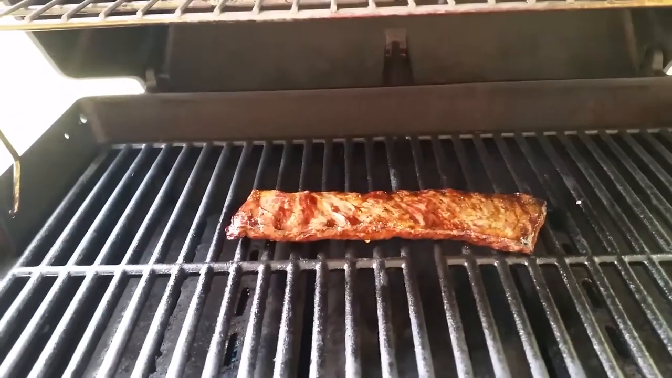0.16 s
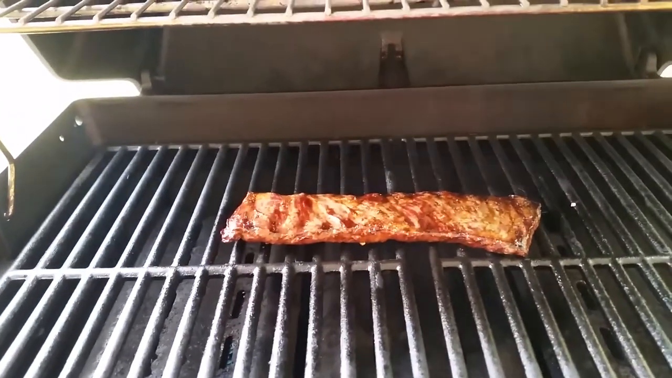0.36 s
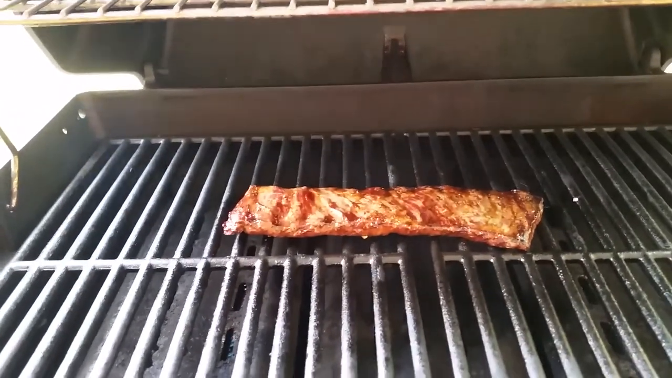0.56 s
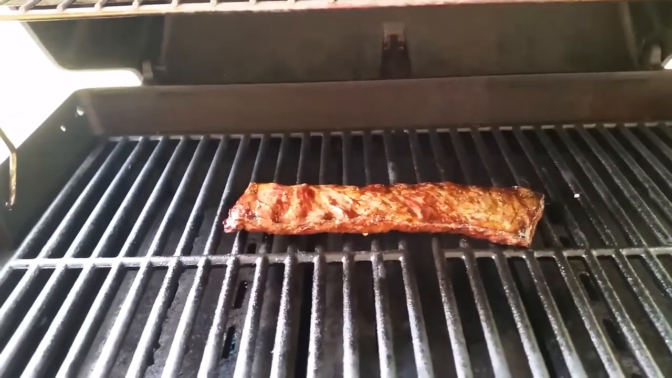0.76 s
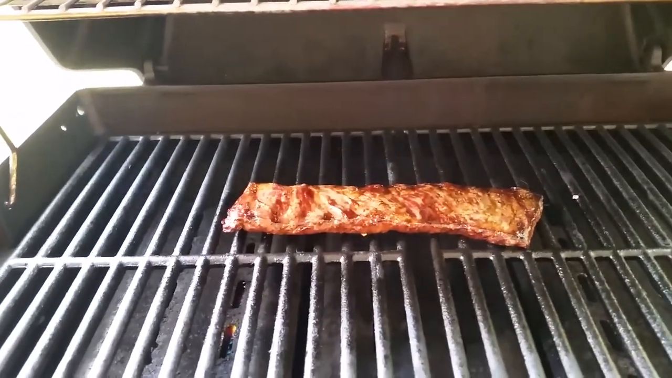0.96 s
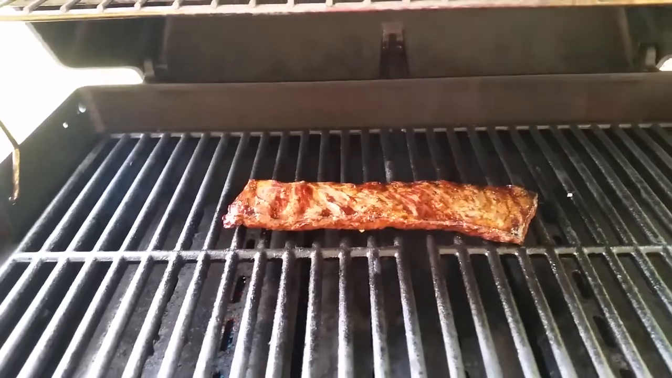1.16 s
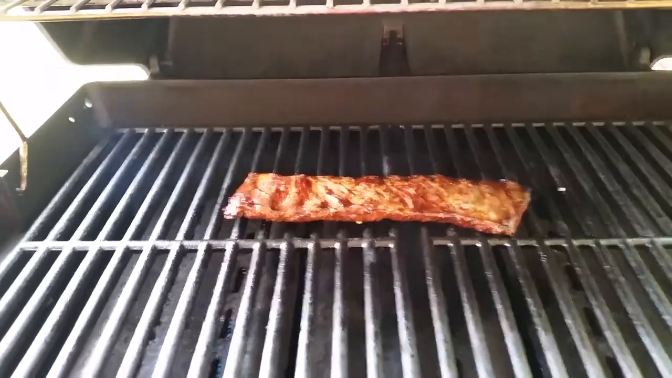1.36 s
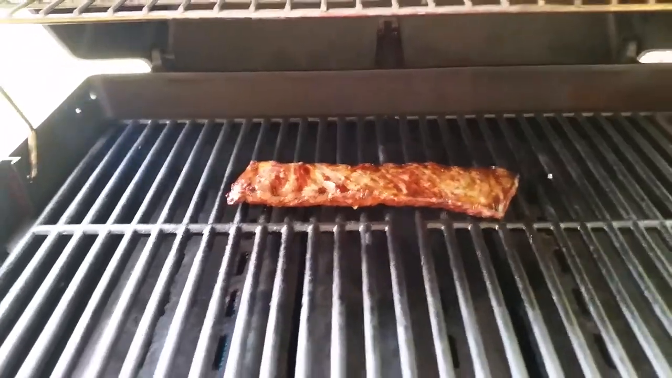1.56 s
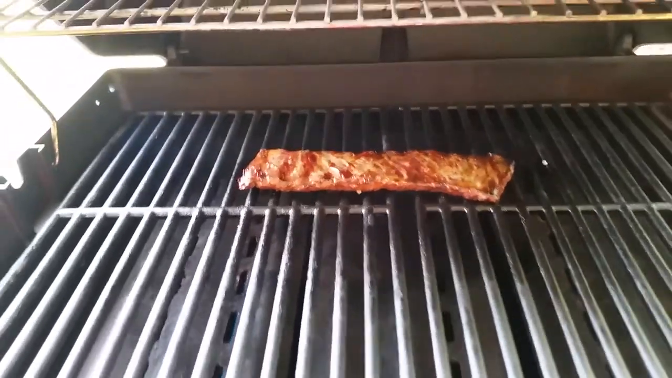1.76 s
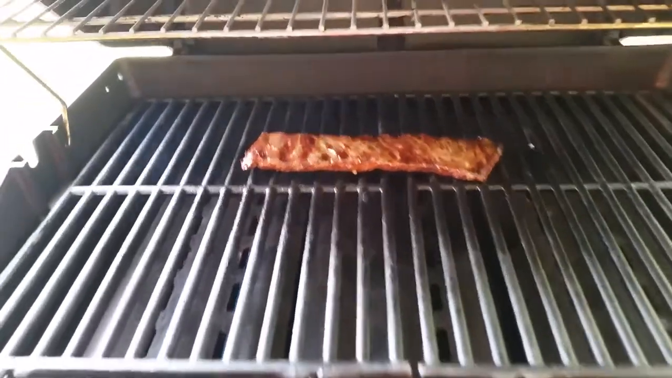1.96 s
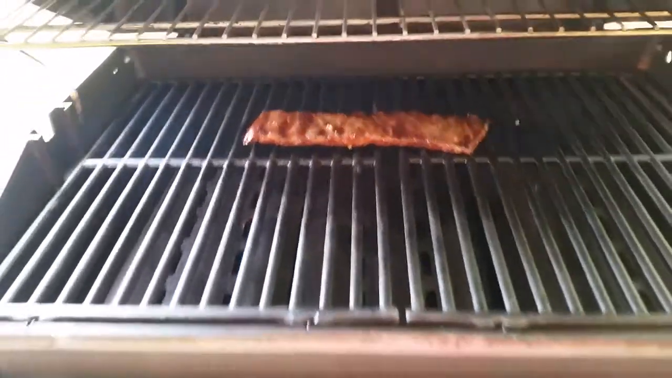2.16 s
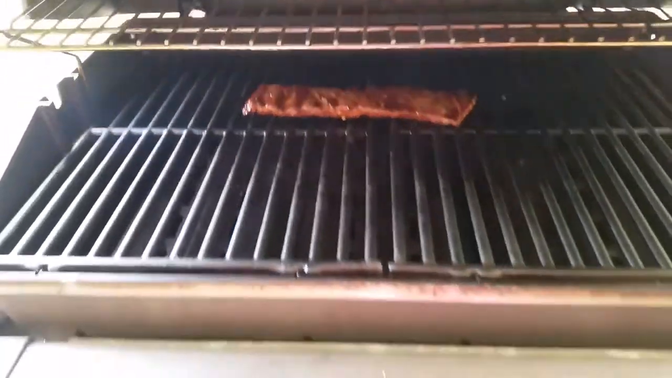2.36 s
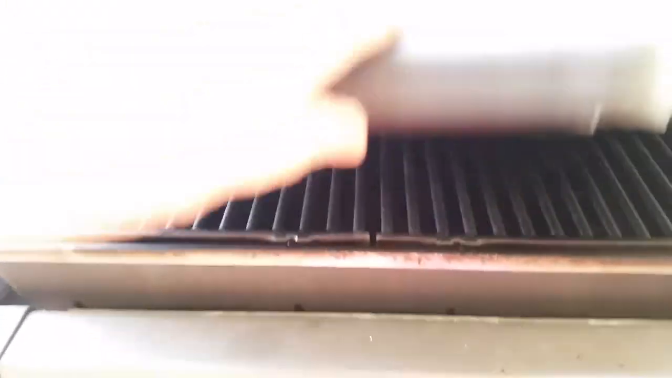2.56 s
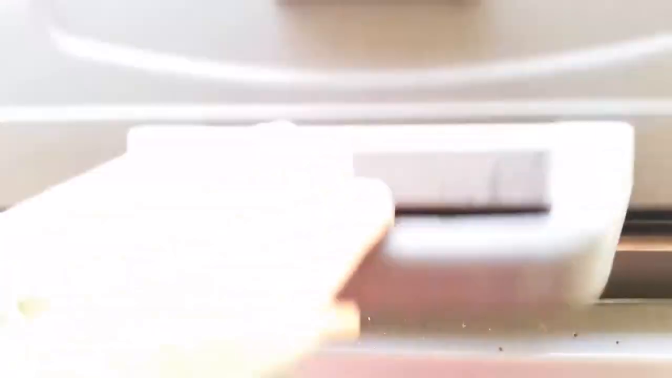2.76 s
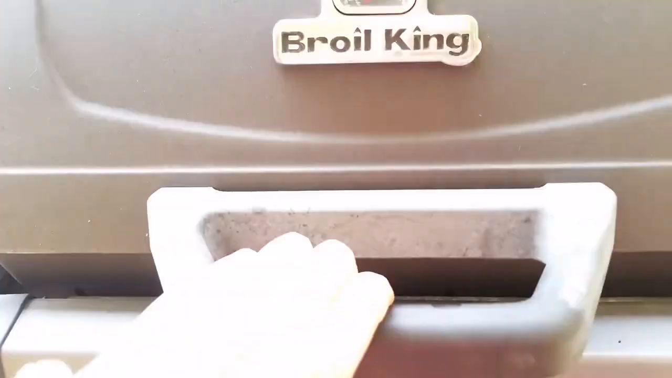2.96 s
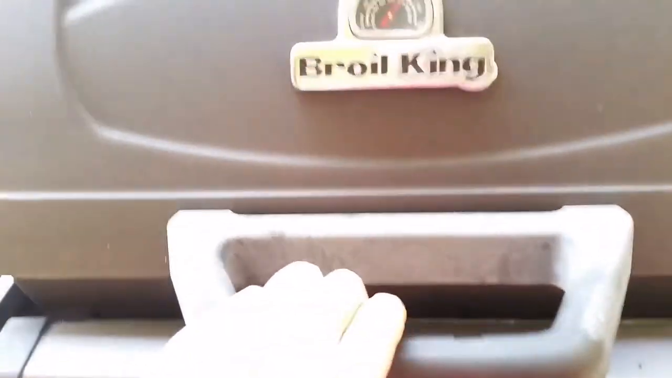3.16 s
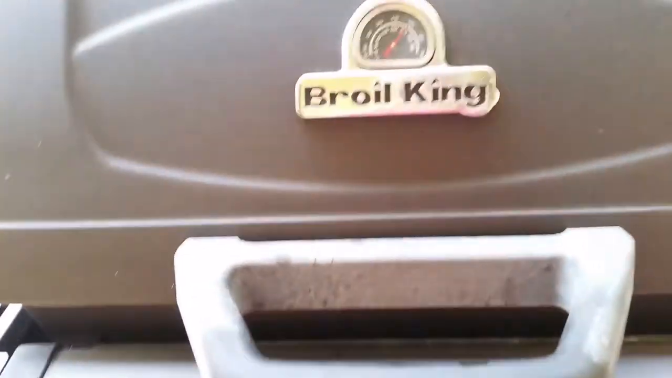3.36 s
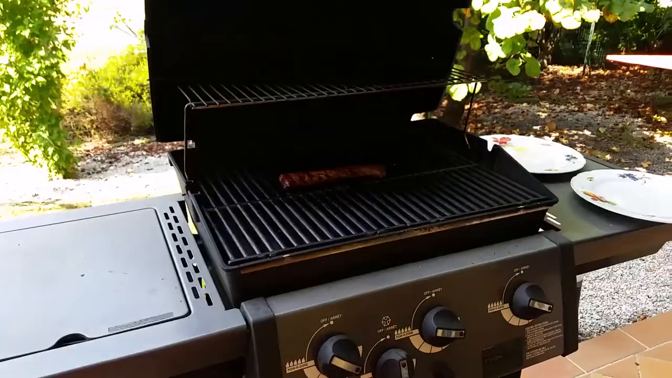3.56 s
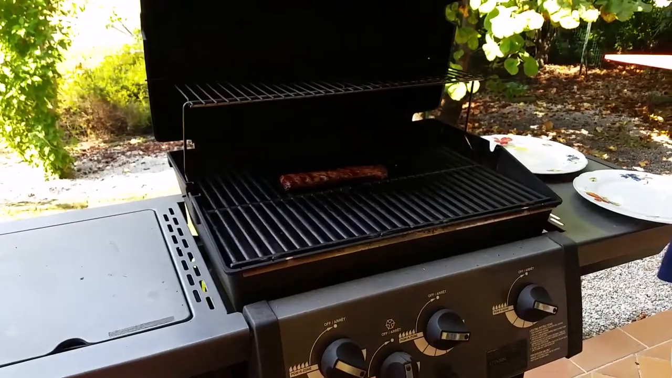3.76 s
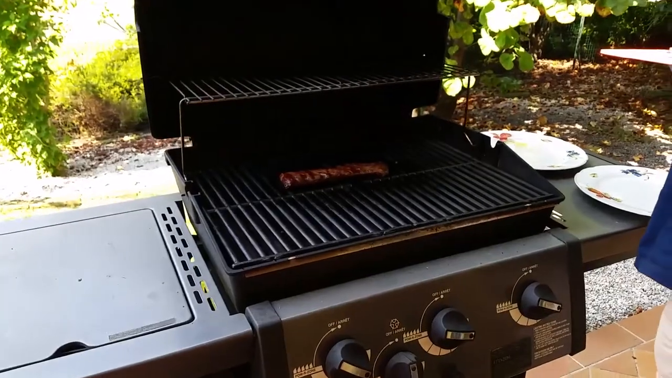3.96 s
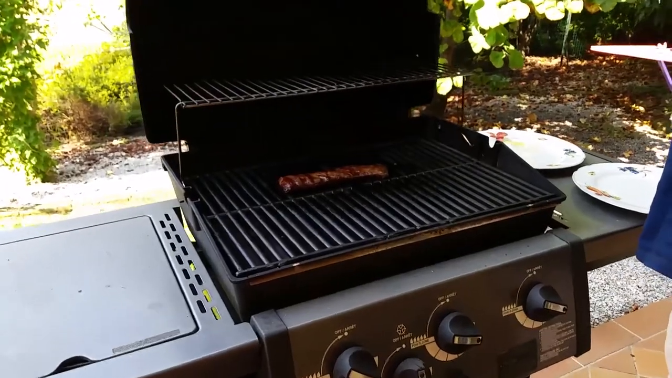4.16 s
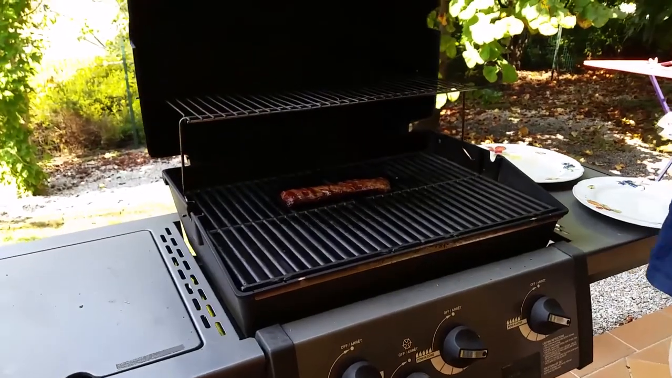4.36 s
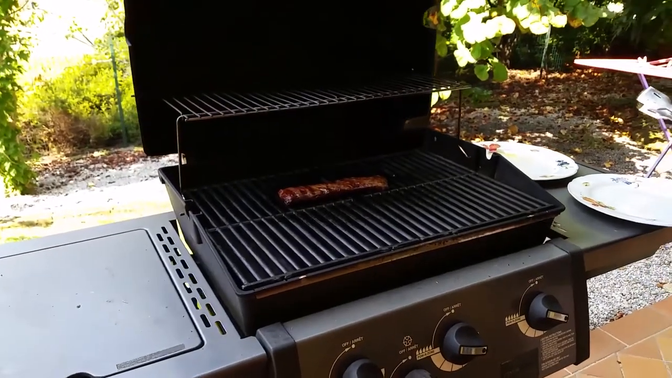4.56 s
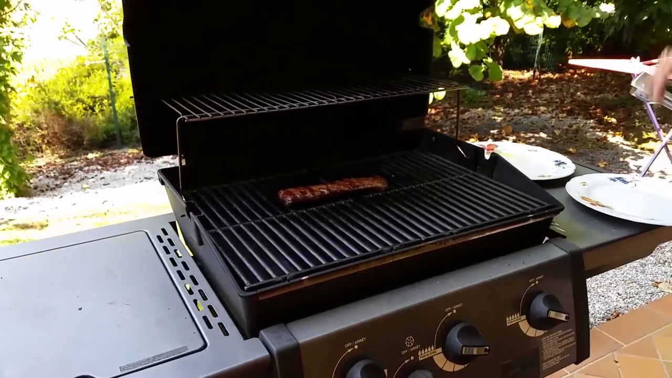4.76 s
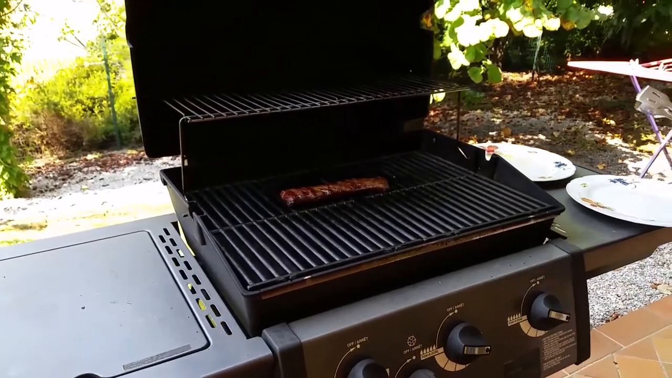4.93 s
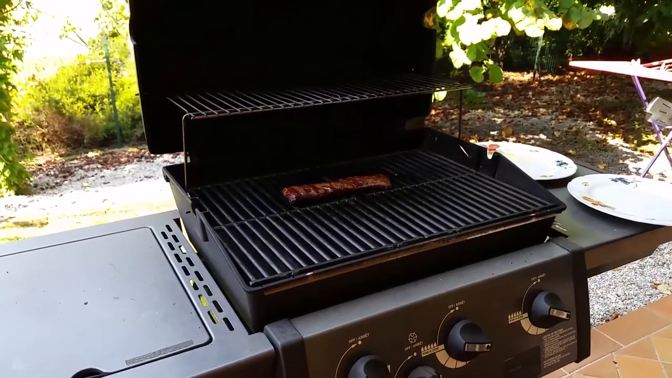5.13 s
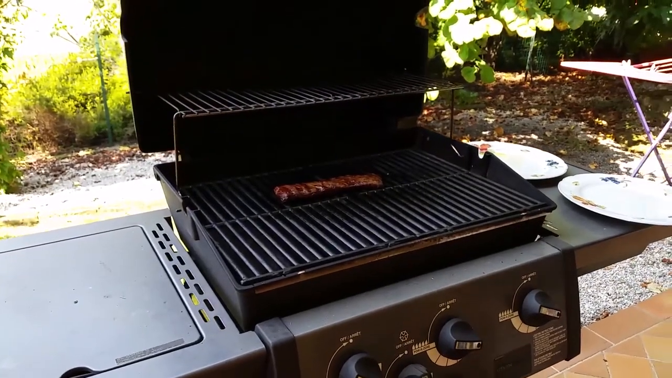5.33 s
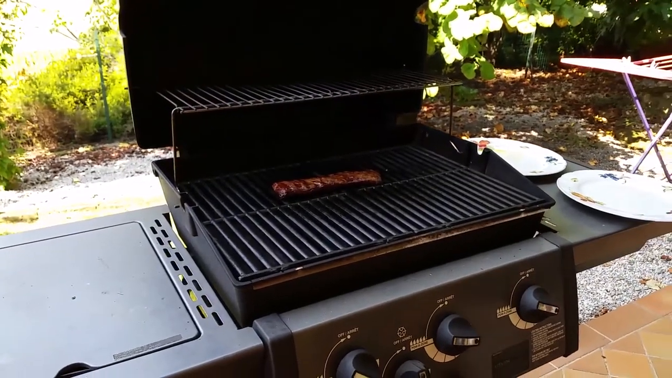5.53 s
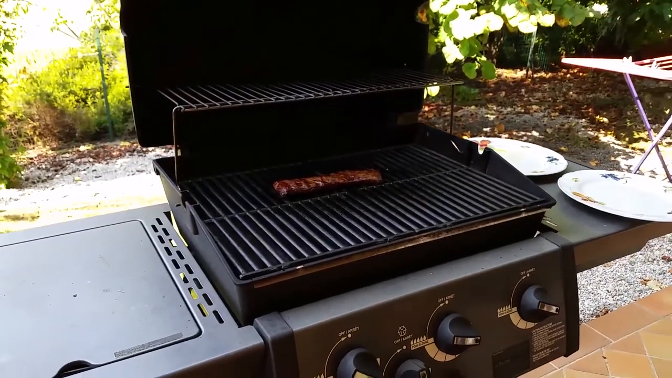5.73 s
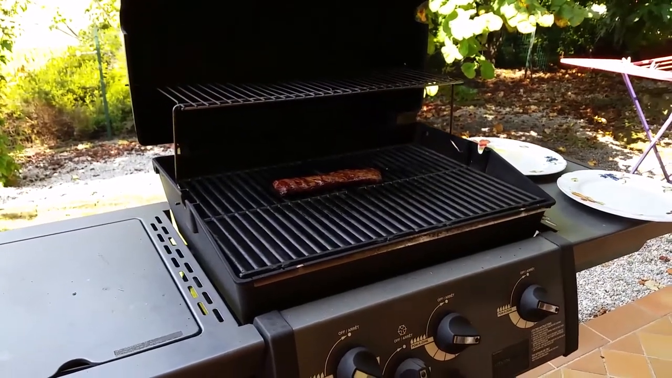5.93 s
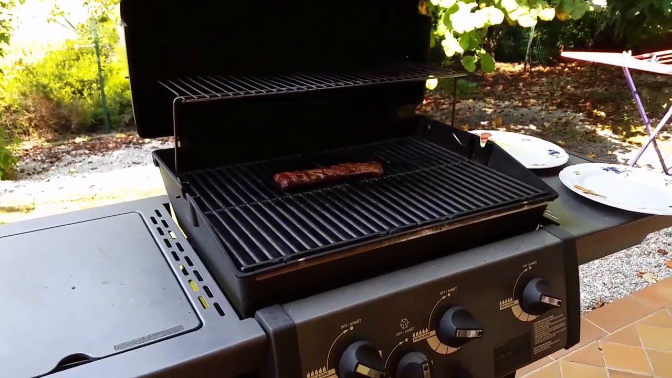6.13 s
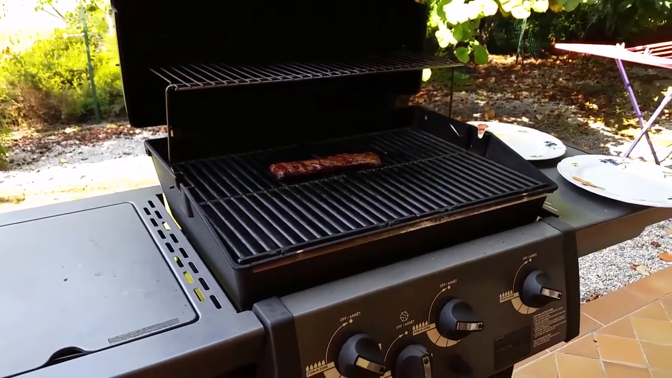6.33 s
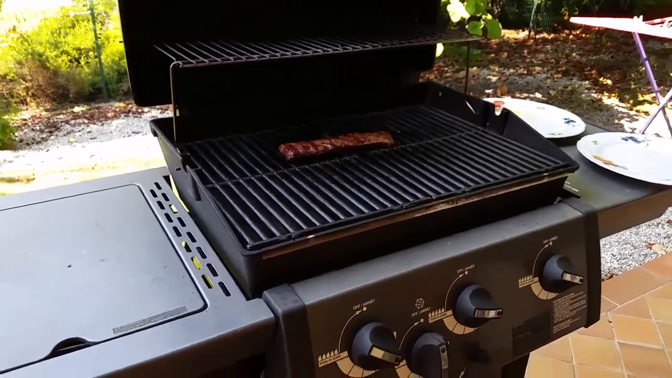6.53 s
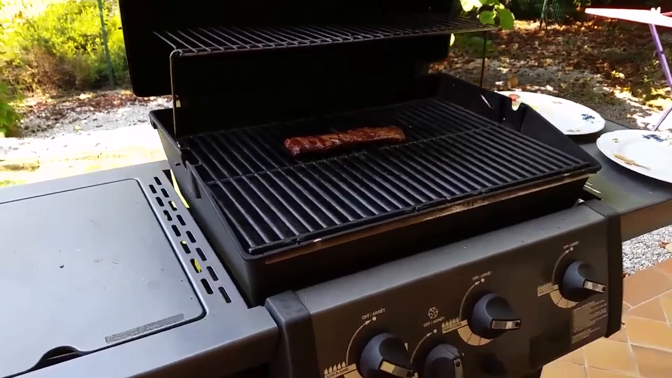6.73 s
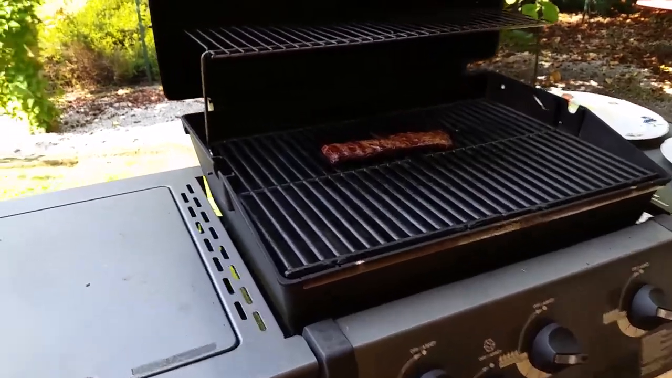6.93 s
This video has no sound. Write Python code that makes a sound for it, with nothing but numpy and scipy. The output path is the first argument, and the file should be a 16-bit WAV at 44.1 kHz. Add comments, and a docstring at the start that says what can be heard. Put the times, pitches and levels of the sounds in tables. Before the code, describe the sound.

Close up on an outdoor gas grill, meat sizzles with bright crackles and fat spits over soft breeze and burner roar. Light handling thuds lead to a loud steel lid slam, which rings as the sizzle dies. After a short cut to silence, sound fades in from a step away: a hard double knock, steadier, thinner sizzling and a cloth swish.

```python
"""Meat sizzles on a gas barbecue outdoors: random steam bursts with a firebox echo, over steam hiss and spitting drops.
The steel lid slams, ringing sine modes and a dense noise clang; the sizzle dies away and the sound cuts to silence.
It fades in again from a step further away: the open lid bumps and clacks against its stop, the sizzle goes on.
Thuds, rattles and rubs are decaying sines and resonant noise; cloth swishes are hiss and a gliding noise band.
Burners (noise), firebox drones (sines) and a fluttering breeze (low noise) lie underneath."""
import sys
import numpy as np
from scipy import signal
from scipy.fft import rfft, irfft, next_fast_len
from scipy.io import wavfile
from scipy.ndimage import map_coordinates

SR = 44100
rng = np.random.default_rng(int(sys.argv[2]) if len(sys.argv) > 2 else 0)


def master_out(mix):
    """Clip the mix to full scale and print it as 16-bit PCM to the path in sys.argv[1]."""
    frames = np.transpose(np.atleast_2d(mix))
    ceiling = np.clip(frames, -1, 1)
    pcm = np.round(ceiling * 32767).astype(np.int16)
    wavfile.write(sys.argv[1], SR, pcm)


N = 308243


def amp(db):
    """Gain for a level in dB."""
    return 10 ** (np.asarray(db) / 20)


def unit(x):
    """Scale to rms 1."""
    return x / np.sqrt(np.mean(x ** 2) + 1e-20)


def along(points, hz):
    """Interpolate (Hz, value) points on a log frequency axis."""
    point_hz, value = np.transpose(points)
    return np.interp(np.log(hz + 1), np.log(point_hz + 1), value)


def curves(rows):
    """One value per sample for each column after the time."""
    time_s, *columns = np.transpose(rows)
    return [np.interp(np.arange(N) / SR, time_s, column) for column in columns]


def wobble(knots_per_s):
    """A smooth random curve through normally distributed knots."""
    knots = rng.standard_normal(int(N * knots_per_s / SR) + 4)
    return map_coordinates(knots, [np.arange(N) * knots_per_s / SR])


def filtered(x, response):
    """Multiply the spectrum of x by a response of frequency."""
    n = x.shape[-1]
    padded = next_fast_len(n + 8192)
    spectrum = rfft(x, padded) * response(np.fft.rfftfreq(padded, 1 / SR))
    return irfft(spectrum, padded)[..., :n]


def pan(left_over_right_db):
    """Left and right gains for a level difference."""
    return unit(amp(np.array([[left_over_right_db], [-left_over_right_db]]) / 2))


def noise(spectrum, size, alike_hz):
    """Coloured stereo noise of rms 1; the ears agree well below alike_hz."""
    def mid_side(hz):
        turn = np.pi / 4 * hz / (hz + alike_hz)
        return amp(along(spectrum, hz)) * [np.cos(turn), np.sin(turn)]
    mid, side = filtered(rng.standard_normal((2, size)), mid_side)
    return unit(np.array([mid + side, mid - side]))


def tilted(spectrum, db_per_octave):
    """Tilt (Hz, dB) points about 1 kHz."""
    return [(hz, db + db_per_octave * np.log2(hz / 1000)) for hz, db in spectrum]


def ear_colour(x, table):
    """Colour each ear separately, from (Hz, left dB, right dB) rows."""
    rows = np.array(table)
    return filtered(x, lambda hz: amp([along(rows[:, [0, ear]], hz) for ear in (1, 2)]))


def decay(t, t60):
    """Exponential decay, 60 dB in t60 seconds."""
    return np.exp(-np.log(1000) * t / np.maximum(t60, 1e-4))


def add(track, start_s, sound):
    """Mix a sound into the track."""
    part = track[:, round(start_s * SR):][:, :sound.shape[-1]]
    part += sound[..., :part.shape[-1]]


# Breeze between puffs. Each row: time in seconds, level in dB before flutter.
DRAUGHT_LEVEL = [(0, -42.5), (1.3, -48), (1.7, -46), (3.2, -45.5), (3.6, -57.5), (4.7, -55.5), (5.4, -61),
                 (6.99, -68)]
# Wind puffs. Each row: peak time in seconds, half-width to 1/e in seconds, level in dB.
GUSTS = [(.08, 0.046, -42), (.3, 0.065, -41), (.47, 0.074, -32.5), (.89, 0.073, -38), (0.979, 0.014, -28),
         (1.16, 0.02, -34), (1.27, 0.11, -37.5), (2.8, 0.024, -38), (3.12, 0.11, -42), (6.62, 0.15, -49)]
# Wind spectrum. Each row: frequency in Hz, relative level in dB.
BREEZE_SPECTRUM = [(12, -36.5), (20, 6), (43, -1.5), (107, -2), (259, -20.5), (300, -43), (390, -55.5),
                   (660, -120)]
FLUTTER_DB, FLUTTER_KNOTS_PER_S = 4.5, 27


def breeze():
    """Turbulence flutters and puffs on each microphone port almost independently, as low noise."""
    t = np.arange(N) / SR
    flutter = amp(FLUTTER_DB * wobble(FLUTTER_KNOTS_PER_S))
    draught = amp(curves(DRAUGHT_LEVEL)[0]) * flutter
    puffs = sum(amp(db) * np.exp(-((t - peak_s) / width_s) ** 2) for peak_s, width_s, db in GUSTS)
    return np.hypot(draught, puffs) * noise(BREEZE_SPECTRUM, N, alike_hz=6.1) * pan(-7.5)


# Burner roar. Each row: time in seconds, level in dB before wobble.
BURNER_LEVEL = [(0, -52.5), (.7, -53), (1.9, -50), (2.55, -48.5), (3.2, -51.5), (4.7, -48.5), (5.2, -49),
                (6.99, -49.5)]
# Burner spectrum. Each row: frequency in Hz, relative level in dB.
BURNER_SPECTRUM = [(40, -21.5), (80, -1.5), (220, -1), (330, -8.5), (420, -9), (490, -6.5), (580, -11),
                   (900, -13), (1300, -17), (2500, -21.5), (3300, -27.5), (7000, -34.5), (16000, -53)]


def burners():
    """Gas flames roar softly as broad noise of wavering level."""
    burner_db, = curves(BURNER_LEVEL)
    return amp(burner_db + 1.9 * wobble(9)) * noise(BURNER_SPECTRUM, N, alike_hz=590) * pan(-2.5)


# Firebox drones. Each row: frequency in Hz, peak level in dB, both before wobble.
DRONES = [(37.7, -51), (107.7, -52.5)]


def firebox_drones():
    """The firebox drones on low sines that waver in level and phase."""
    t = np.arange(N) / SR
    return sum(amp(db + 2.0 * wobble(25)) * np.sin(2 * np.pi * hz * t + 2.3 * wobble(11))
               for hz, db in DRONES)


# Cloth strokes as someone steps past. Each row: start in seconds, length in seconds, share spent rising,
# hiss in dB, rustle in dB, rustle start in Hz, rustle end in Hz.
SWISHES = [(5.6, .185, 0.44, -29, -44.5, 2594, 2250), (5.969, .48, 0.63, -38.5, -45, 2988, 2150),
           (6.11, 0.071, .45, -53, -44, 2790, 2550), (6.19, .11, .45, -54, -48, 2707, 2600)]
# Fibre hiss. Each row: frequency in Hz, left level in dB, right level in dB (relative).
CLOTH_SPECTRUM = [(900, -37, -38), (1910, -16, -10.5), (3300, -12, -6.5), (4600, -11, -5),
                  (5570, -16, -5.5), (6860, -12, 0), (8150, -7, -3.5), (9700, 6, 0.5), (11500, -0.5, -1),
                  (15500, -7, -6.5)]
RUSTLE_HALF_WIDTH_HZ, RUSTLE_UNEVEN_DB, SWISH_EXPONENT = 500, 2.2, 1.3


def swishes():
    """Fibres hiss under each stroke while a narrow band of rustle glides down in pitch."""
    out = np.zeros((2, N))
    for start_s, length_s, rise, hiss_db, rustle_db, start_hz, end_hz in SWISHES:
        n = round(length_s * SR)
        stroke = np.interp(np.arange(n) / n, [0, np.clip(rise, .1, .9), 1], [0, .5, 1])
        envelope = np.abs(np.sin(np.pi * stroke)) ** SWISH_EXPONENT
        band = filtered(rng.standard_normal((2, n)), lambda f: 1 / (1 + (f / RUSTLE_HALF_WIDTH_HZ) ** 2))
        carrier = np.cos(2 * np.pi * np.cumsum(np.linspace(start_hz, end_hz, n)) / SR)
        rustle = unit(band * carrier)
        hiss = unit(ear_colour(rng.standard_normal((2, n)), CLOTH_SPECTRUM))
        folds = amp(RUSTLE_UNEVEN_DB * wobble(41.7)[:n])
        add(out, start_s, (amp(hiss_db) * hiss + amp(rustle_db) * folds * rustle) * envelope)
    return out


# Rubbing parts and sticking hinges. Each row: start in seconds, length in seconds,
# level in dB before the envelope, resonance in Hz, width of each resonator stage in Hz.
RUBS = [(2.05, .3, -57, 483, 13), (2.42, 0.14, -52.5, 930, 420), (2.468, .22, -50, 475, 290),
        (2.66, 0.36, -58, 489, 15), (2.725, 0.59, -47, 220, 57), (4.306, 0.29, -39, 260, 490),
        (4.34, 0.11, -46.5, 1770, 390), (4.474, 0.031, -35, 1920, 550), (4.759, 0.019, -47, 1570, 400),
        (4.912, .022, -48.5, 1710, 500)]


def rubs():
    """Quick, uneven slips excite one resonance of the rubbing part."""
    out = np.zeros((2, N))
    for start_s, length_s, db, hz, width_hz in RUBS:
        n = round(length_s * SR)
        slips = rng.standard_normal((2, n)) * (rng.random(n) < 1800 / SR)  # 1800 slips a second on average
        crossed = slips + slips[::-1] * 0.33  # each ear hears some of the other's slips

        def resonance(f):
            damping = 1j * f * width_hz
            return (damping / (hz * hz - f * f + damping)) ** 2
        envelope = np.sin(np.pi * np.arange(n) / n)
        add(out, start_s, amp(db) * unit(filtered(crossed, resonance)) * envelope)
    return out


# Clacks of the open lid's hinge and other loose parts.
# Each row: start in seconds, level in dB, t60 in seconds, tilt in dB per octave.
CLACKS = [(4.372, -43.5, .04, -3), (4.4235, -35.5, 0.084, -8.5), (4.4640, -24.5, .018, -5.5),
          (4.4796, -24, 0.044, 4), (4.483, -24, 0.045, 1.5), (4.4918, -26.5, 0.078, 0),
          (4.501, -32, 0.065, 0.5), (4.516, -36, 0.14, -4), (5.887, -37.5, 0.11, 5), (6.417, -41.5, .05, 5)]
# Clack spectrum before tilt. Each row: frequency in Hz, relative level in dB.
CLACK_SPECTRUM = [(200, -29.5), (450, -6.5), (800, -2), (1200, -14.5), (1900, 3.5), (2400, -8), (3200, -12),
                  (4200, -18), (8000, -21), (10000, -13), (16000, -28)]


def clacks():
    """Each clack is a short noise burst with its own decay and spectral tilt."""
    out, t = np.zeros((2, N)), np.arange(SR // 4) / SR
    for start_s, db, t60, tilt_db in CLACKS:
        clack = noise(tilted(CLACK_SPECTRUM, tilt_db), len(t), alike_hz=2480)
        add(out, start_s, amp(db) * decay(t, t60) * clack)
    return out * pan(-2.2)


# Soft thuds: lid against its stop, handling knocks, footsteps.
# Each row: start in seconds, thud in dB, thud in Hz, thud t60 in seconds, rattle in dB.
BUMPS = [(1.238, -43, 189, 0.035, -40.5), (2.21, -29.5, 184, 0.063, -42), (2.503, -32.5, 187, 0.088, -38),
         (2.567, -35, 260, 0.033, -38.5), (2.615, -36, 257, 0.066, -41.5), (2.652, -34.5, 280, 0.06, -39.5),
         (3.032, -34.5, 258, 0.053, -43.5), (3.143, -32, 250, 0.037, -44.5), (3.517, -28, 213, 0.13, -39.5),
         (3.7027, -37.5, 196, 0.095, -79), (4.4221, -28.5, 223, 0.21, -40.5), (4.4605, -20, 132, 0.14, -30),
         (4.4799, -18.5, 211, 0.061, -30), (4.4844, -14.5, 233, 0.11, -45), (4.497, -21, 269, 0.31, -38.5),
         (4.764, -36.5, 125, 0.12, -45.5), (4.906, -32.5, 206, 0.1, -49), (5.9106, -20, 176, 0.0087, -28.5),
         (6.416, -48, 150, 0.042, -37.5)]
# Rattle before the bass cut. Each row: frequency in Hz, relative level in dB.
RATTLE_SPECTRUM = [(59, -49.5), (100, -6.5), (242, -11), (381, -16), (670, -28.5), (750, -23), (1290, -33),
                   (1850, -33.5), (2150, -37.5), (2320, -35.5), (4080, -43.5), (7740, -52.5), (9000, -61.5),
                   (12000, -55.5), (19800, -100)]
RATTLE_T60_OVER_THUD = 2.73
PANEL_HZ, PANEL_OVER_THUD_DB, PANEL_T60_S = 439, -23.5, 0.83


def bumps():
    """Each soft thud is a decaying sine with a faint panel ring and a noise rattle."""
    out, t = np.zeros((2, N)), np.arange(SR // 2) / SR
    # small parts have little bass
    colour = [(hz, db - 9 / (1 + (hz / 450) ** 4)) for hz, db in RATTLE_SPECTRUM]
    panel = decay(t, PANEL_T60_S) * np.sin(2 * np.pi * PANEL_HZ * t)
    for start_s, thud_db, thud_hz, thud_t60, rattle_db in BUMPS:
        thud = amp(thud_db) * decay(t, thud_t60) * np.sin(2 * np.pi * thud_hz * t)
        # thuds shorter than 0.15 s ring the panel less
        ring = amp(thud_db + PANEL_OVER_THUD_DB) * min(thud_t60 / 0.15, 1) * panel
        rattle_decay = decay(t, RATTLE_T60_OVER_THUD * thud_t60)
        rattle = amp(rattle_db) * rattle_decay * noise(colour, len(t), alike_hz=1470)
        onset = 1 - np.exp(-t / 0.00025)
        add(out, start_s, (thud + ring + rattle) * onset)
    return out * pan(-4.0)


# Lid landing and chattering. Each row: start in seconds, boom in dB, clang in dB, clang tilt in dB per octave.
SLAM = [(3.26, -5, -18.5, -0.5), (3.2667, -17.5, -14, -1.5), (3.275, -22, -16.5, -4),
        (3.281, -23, -16, -3.5), (3.297, -25.5, -16.5, -4), (3.316, -21.5, -24.5, 1.5),
        (3.322, -26.5, -19.5, -4.5)]
# Ringing modes of lid and firebox, low to high.
# Each row: frequency in Hz, relative level in dB before scatter, t60 in seconds.
STEEL_MODES = [(137.6, -1, 0.45), (175, 3.5, 0.72), (208, 14.5, 0.11), (241, 4, 0.3), (258.3, 11, 0.18),
               (288, -4.5, 0.24), (385, -13.5, 0.63), (434.6, 1, 0.48), (469, -8, 0.26), (487, -13, 0.2),
               (580, -6, .42), (629, -7, 0.16), (703.3, -10.5, 0.69), (734, -0.5, 0.35), (812, -10, 0.35),
               (824, -3.5, .25), (842, 2.5, 0.34), (956, -15.5, 0.42), (1000, -1, 0.28), (1010, -7.5, 0.27),
               (1085, 0, .38), (1120, -10.5, .25), (1282, -12, 0.27), (1351, -15, 0.3), (1700, -13, 0.27),
               (1775, -16.5, 0.63), (1840, -13.5, 0.6), (2090, -14.5, 0.39), (2306, -15, .5),
               (2710, -8.5, 0.44), (2860, -13, 0.46), (3900, -10, 0.19), (10200, -22, .42),
               (10500, -22.5, .48)]
# Dense sheet modes before tilt. Each row: frequency in Hz, relative level in dB.
CLANG_SPECTRUM = [(65, -39), (110, -19), (305, -10.5), (353, -24), (435, -17.5), (525, -21.5), (941, -21),
                  (1090, -20.5), (1340, -25), (2720, -19.5), (7560, -29.5), (10100, -20), (16000, -30)]
# Clang decay. Each row: frequency in Hz, t60 in seconds.
CLANG_T60 = [(120, 0.53), (400, 0.28), (1000, 0.44), (2500, 0.34), (5000, 0.3), (10000, 0.2), (16000, 0.2)]


def lid():
    """Every contact rings the steel modes and a dense clang with a decay time per frequency."""
    out, t = np.zeros((2, N)), np.arange(SR * 3 // 4) / SR
    hz, mode_db, t60 = np.transpose(STEEL_MODES)[..., None]
    ridges_db = 3 * rng.standard_normal(1800)  # crowded sheet modes, shared by all contacts

    def ridges(f):
        return amp(np.interp(f, np.linspace(0, SR / 2, len(ridges_db)), ridges_db) * f / (f + 1500))
    for start_s, boom_db, clang_db, tilt_db in SLAM:
        scatter_db = np.minimum(hz / 500, 2) * rng.standard_normal((2, len(hz), 1))
        phase = hz / 1100 * rng.standard_normal((2, len(hz), 1))  # higher modes reach the ears out of step
        modes = amp(mode_db + scatter_db) * decay(t, t60) * np.sin(2 * np.pi * hz * t + phase)
        boom = modes.sum(1) / np.linalg.norm(amp(mode_db))
        sheet = noise(tilted(CLANG_SPECTRUM, tilt_db), len(t), alike_hz=700)
        f, frame_s, z = signal.stft(unit(filtered(sheet, ridges)), SR, nperseg=256)
        damped = z * decay(frame_s, along(CLANG_T60, f)[:, None])
        clang = signal.istft(damped, SR, nperseg=256)[1][:, :len(t)]
        contact = 0.5 + 0.74 * decay(t, 0.035)  # the crack of the contact itself
        onset = 1 - np.exp(-t / 0.0003)
        add(out, start_s, (amp(boom_db) * boom + amp(clang_db) * contact * clang) * onset)
    return filtered(out, lambda f: (1j * f / (1j * f + 60)) ** 2)  # a thin shell radiates no deep bass


DROP_OVER_SIZZLE_DB, DROP_SCATTER_DB, DROP_LOW_DB, DROP_SIDE_DB = 4, 2, -35, 5


def small_drops(count):
    """Drops at random moments, their level scattered about a step above the sizzle."""
    drops = []
    for start_s in rng.uniform(0, N / SR, count):
        size, side = rng.standard_normal(2)
        sizzle_db = np.interp(start_s, *np.transpose(NEAR_LEVEL if start_s < FAR_FROM_S else FAR_LEVEL))
        db = sizzle_db + DROP_OVER_SIZZLE_DB + DROP_SCATTER_DB * size
        drops.append((start_s, db, DROP_LOW_DB, DROP_SIDE_DB * side))
    return drops


# Large fat drops bursting. Each row: time in seconds, nominal level in dB,
# low crackle in dB re treble, left over right in dB.
SPITS = [(0.0437, -18, -32, 0), (0.4463, -22, -22.5, 5), (0.58, -19, -40, 6), (0.826, -17, -27, 2),
         (1.057, -21, -40, -2), (1.398, -15.5, -19.5, -6), (1.452, -20, -22, -6), (1.51, -23, -36, -6),
         (1.565, -23, -28, -5), (1.9704, -17.5, -16.5, 1), (1.9737, -22, -31, 3), (2.0408, -25, -41, -2),
         (2.281, -19, -20.5, 4.5), (2.3377, -11, -44, 7), (2.5268, -19.5, -42, 5.5),
         (2.605, -25.5, -37.5, 3), (4.682, -20, -41.5, 11), (4.8008, -26.5, -27, 5),
         (5.0071, -23.5, -21.5, 12), (5.046, -24, -35, 15), (5.1205, -38, -42, 14),
         (5.2156, -18.5, -17, 14), (5.9675, -28.5, -38, 6)]
PING_HZ, PING_T60_S, PING_DB = 14700, .0012, 0
WALLS_DB, WALLS_T60_S, SPRAY_DB, SPRAY_T60_S = -11, .02, -26, .2


def spits():
    """A drop snaps open with a tiny ping; wall reflections and spray follow as slower noise decays."""
    out, t = np.zeros((2, N)), np.arange(SR // 8) / SR
    snap = decay(t, PING_T60_S)
    shape = snap + amp(WALLS_DB) * decay(t, WALLS_T60_S) + amp(SPRAY_DB) * decay(t, SPRAY_T60_S)
    for start_s, db, low_db, side_db in SPITS + small_drops(count=20):
        colour = [(600, low_db - 32), (1800, low_db + 15.5), (5000, low_db + 12.5), (9500, 0), (16000, 0.012)]
        ping_hz = PING_HZ * rng.uniform(.93, 1.07)
        ping = amp(PING_DB) * snap * np.sin(2 * np.pi * ping_hz * t)
        burst = ping + shape * noise(colour, len(t), alike_hz=2505)
        add(out, start_s + .0009, amp(db - 1.5) * pan(side_db) * burst)
    return out


def frying(colour, bursts_per_s, spread_db, flurry_db, hiss_db, echo_db, echo_t60):
    """Tiny steam bubbles burst in flurries; each echoes briefly in the firebox, over a hiss of steam."""
    flurry = amp(flurry_db * unit(1.3 * wobble(19) + wobble(110)))
    strength = amp(spread_db * np.minimum(rng.exponential(size=N), 4.4))
    size = flurry * strength * (rng.random(N) < bursts_per_s / SR)
    bursts = unit(size * (rng.choice([-1, 1], (2, N)) + 0.12 * rng.standard_normal((2, N))))
    t = np.arange(SR // 50) / SR
    ring = decay(t, echo_t60) ** 2  # energy decay
    energy = signal.fftconvolve(bursts ** 2, ring[None] / ring.sum(), axes=1)[:, :N]
    echo = np.sqrt(np.abs(energy))
    wash = (amp(echo_db) * echo + amp(hiss_db)) * rng.standard_normal((2, N))
    thinned = filtered(bursts + wash, lambda hz: hz / (hz + 300))
    return unit(ear_colour(thinned, colour))


# Sizzle close to the grate, then under the closing lid. Each row: time in seconds, level in dB before swell.
NEAR_LEVEL = [(0, -31), (1.75, -31), (2.7, -33.5), (2.86, -38), (3.2, -49.5), (3.5, -58), (3.75, -66.5)]
# Sizzle from a step away. Each row: time in seconds, level in dB before swell.
FAR_LEVEL = [(4.35, -36), (4.95, -35.5), (5.1, -34), (5.5, -36), (5.9, -35.5), (6.3, -37), (6.99, -37.5)]
# Frying fat, near and far. Each row: frequency in Hz, left level in dB, right level in dB (relative).
NEAR_FAT = [(500, -20, -31), (1570, -24, -16.5), (1890, -19.5, -9.5), (3400, -22, -18),
            (3870, -18.5, -12.5), (6960, -21, -4.5), (8540, -7.5, -12), (9570, -1.5, 0.5),
            (11100, 0.5, -3.5), (13600, -5.5, -1), (14700, -6, -4.5)]
FAR_FAT = [(500, -22, -20), (2000, -18, -17), (3200, -23, -23), (4600, -18, -14), (5700, -23, -16.5),
           (7200, -20, -13), (8600, -11, -10.5), (9700, -0.5, -7.5), (12500, 0, -5.5), (14300, -3.5, -7.5),
           (15600, -2.5, -6.5)]
FAR_FROM_S = 3.9


def sizzle():
    """The frying swells unevenly, dies away under the closing lid, then goes on from a step away."""
    near_db, far_db = curves(NEAR_LEVEL)[0], curves(FAR_LEVEL)[0]
    near = frying(NEAR_FAT, bursts_per_s=2300, spread_db=3.6, flurry_db=1.5,
                  hiss_db=-0.5, echo_db=1, echo_t60=.02)
    far = frying(FAR_FAT, bursts_per_s=1800, spread_db=3.3, flurry_db=1.7,
                 hiss_db=0, echo_db=1, echo_t60=.02)
    swell = amp(0.45 * wobble(15))
    is_near = np.arange(N) < FAR_FROM_S * SR
    return swell * np.where(is_near, amp(near_db) * near, amp(far_db) * far)


# Microphone ports, the left one deaf in the lower treble; applied to spits and lid.
# Each row: frequency in Hz, left gain in dB, right gain in dB.
PORTS = [(301, -3.5, -3), (1500, -2.5, 3.5), (2520, -7, 2.5), (3250, -10, -3), (5760, -3.5, 8.5),
         (7300, -17.5, 9), (9800, 10, -1.5), (13000, 3, 7), (15500, 1, 6)]


def scene():
    """Sum all sources; spits and lid pass through the port colour."""
    background = breeze() + burners() + firebox_drones()
    handling = swishes() + rubs() + clacks() + bumps()
    return background + handling + ear_colour(lid() + spits(), PORTS) + sizzle()


# Overall cut to silence and fade in. Each row: time in seconds, linear gain.
CUT_AND_FADE_IN = [(0, 1), (3.745, 1), (3.755, 0), (4.1, 0), (4.36, 1), (7, 1)]
TOP_HZ = 16100


def record(dry):
    """Remove everything from TOP_HZ up; the sound cuts abruptly to silence and fades back in."""
    gain, = curves(CUT_AND_FADE_IN)
    return gain * filtered(dry, lambda hz: hz < TOP_HZ)


dry = scene()
out = record(dry)
master_out(out)
```